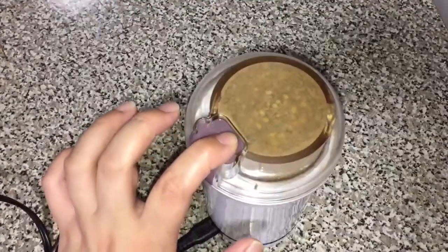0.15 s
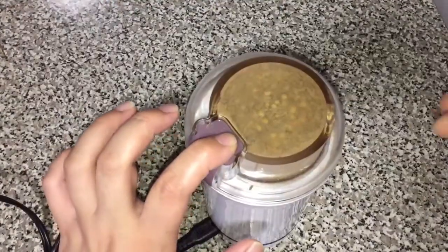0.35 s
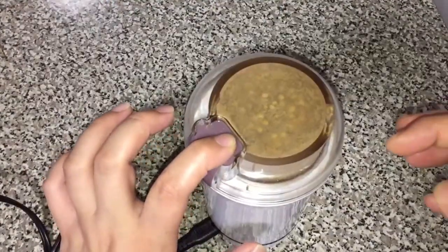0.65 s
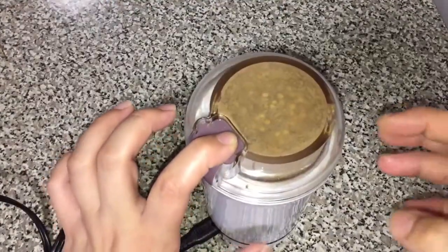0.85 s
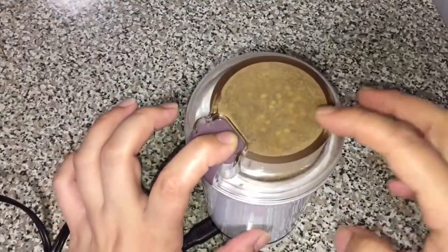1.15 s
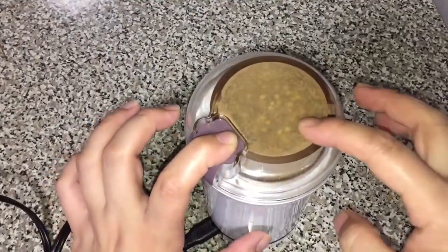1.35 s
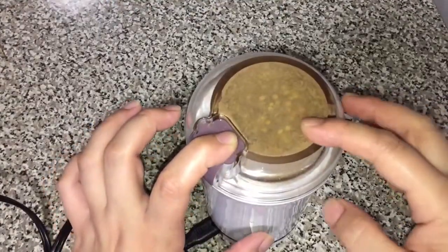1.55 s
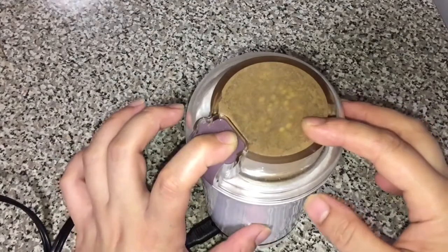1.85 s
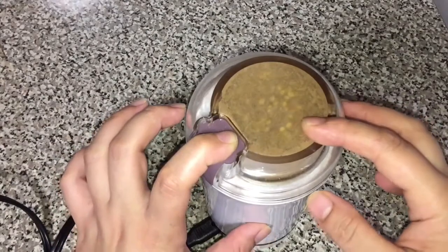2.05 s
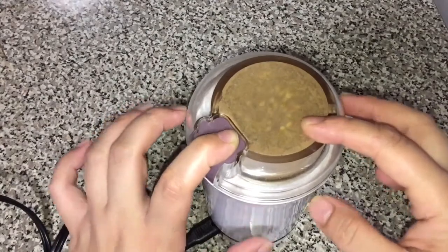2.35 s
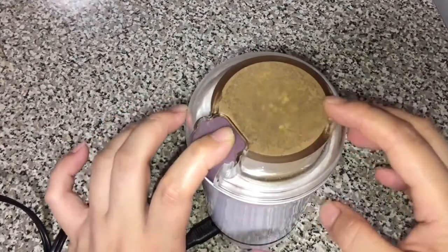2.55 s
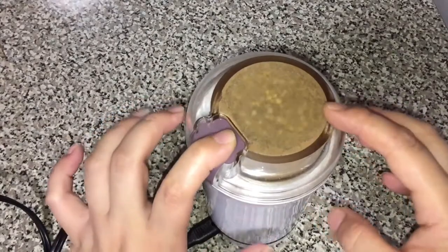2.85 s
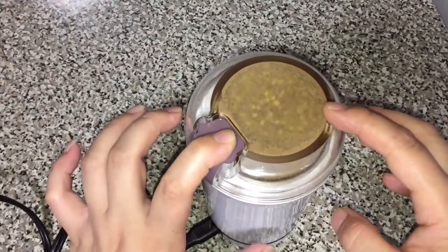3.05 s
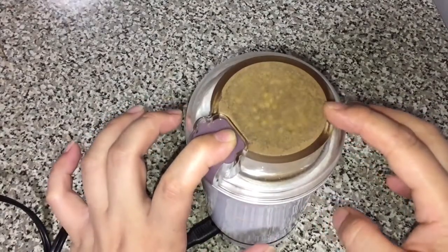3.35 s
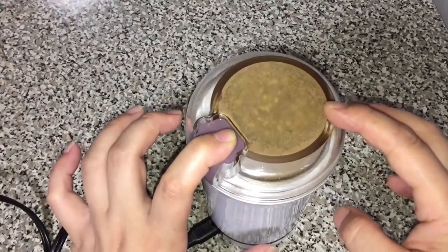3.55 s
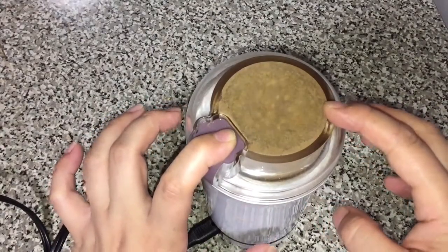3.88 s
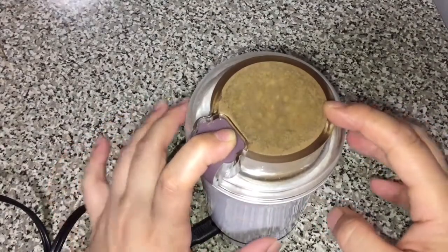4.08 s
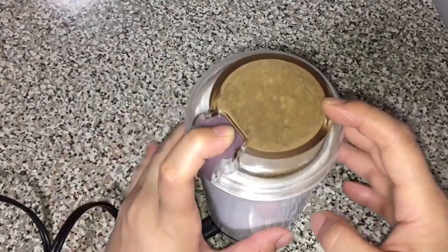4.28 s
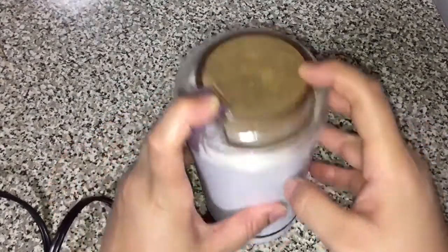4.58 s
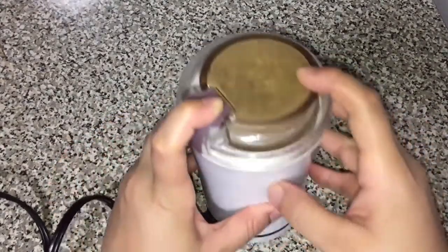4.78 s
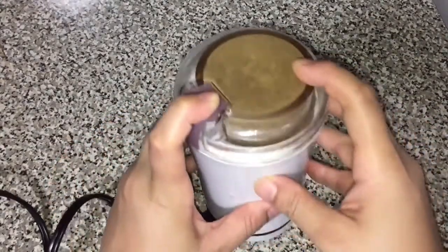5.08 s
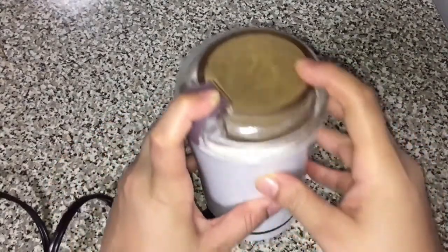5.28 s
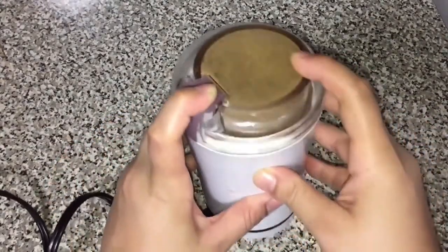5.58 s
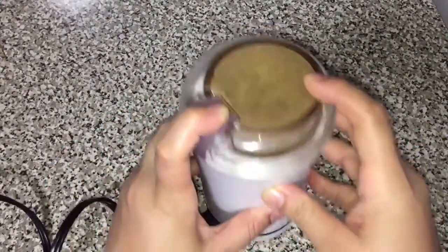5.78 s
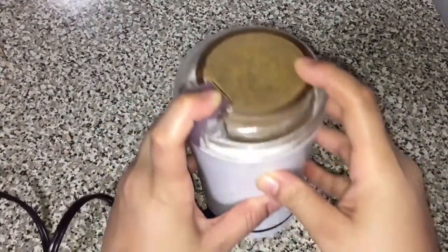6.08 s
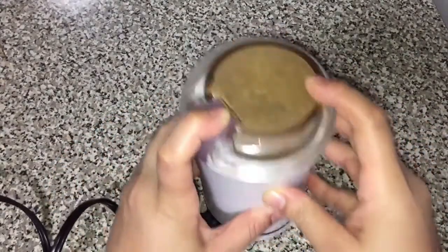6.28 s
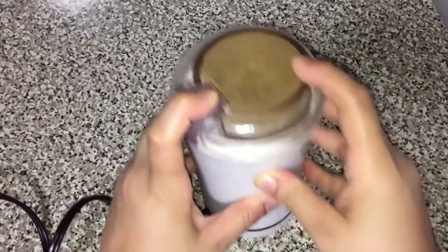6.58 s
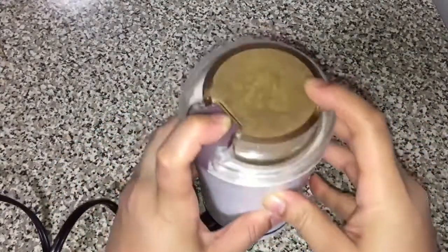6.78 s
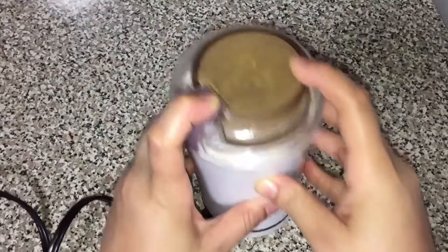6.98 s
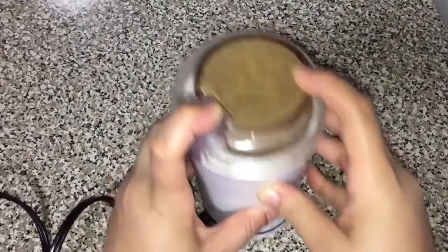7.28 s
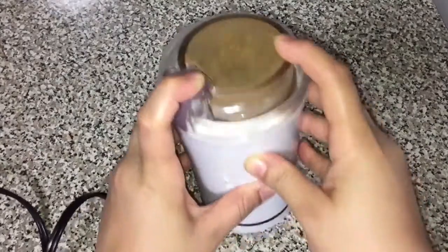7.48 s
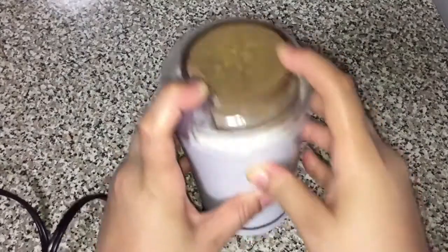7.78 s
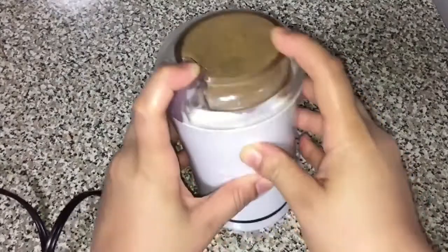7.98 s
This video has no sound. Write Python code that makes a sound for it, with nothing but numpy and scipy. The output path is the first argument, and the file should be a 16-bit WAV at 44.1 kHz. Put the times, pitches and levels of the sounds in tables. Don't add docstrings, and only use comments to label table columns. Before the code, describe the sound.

A blade grinder chews whole spices on a stone counter, close to the microphone. Buzzing motor, ringing cup, rattling lid and bright gritty hiss run continuously, interrupted once by a third-of-a-second coast-down and a thumping, rattling restart. The final half is hand-held: quick regular shakes make the motor hum and whine swell and waver, while the grind becomes slightly smoother. Quiet refrigerator drone behind; mono, fairly dry.

```python
import sys
import numpy as np
from scipy import signal
from scipy.fft import rfft, irfft, next_fast_len
from scipy.io import wavfile
from scipy.ndimage import uniform_filter1d, map_coordinates

SR = 44100
rng = np.random.default_rng(int(sys.argv[2]) if len(sys.argv) > 2 else 0)


def pcm_store(signal):
    levels = np.round(np.clip(np.atleast_2d(signal), -1, 1) * 32767)
    wavfile.write(sys.argv[1], SR, levels.astype(np.int16).T)


def volts_from_decibels(level):
    exponent = np.asarray(level, float) / 20
    return 10 ** exponent


N = 358533
OFF_S, ON_S = 2.53, 2.853
STILL_DB = -14

# time in seconds, turns per second in Hz,
# unbalance level in dB, blade-tip level in dB.
RUNNING = [(0, 258.6, -24.5, -48), (.15, 269.5, -24, -46.5), (.45, 280, -29, -42), (.66, 276.2, -28, -42),
           (.8, 283.5, -28.5, -37.5), (1.02, 287.3, -24.5, -35), (1.32, 283.5, -23, -33.5),
           (1.75, 285.4, -26.5, -34.5), (2.1, 283.5, -26.5, -33), (2.5, 280, -23, -39),
           (3.33, 288.3, -22.5, -31), (4.31, 276.4, -22, -39), (4.44, 278.5, -21, -38.5),
           (4.6, 277.4, -28, -38), (5.15, 281.2, -26, -37.5), (5.7, 285, -26, -45.5),
           (6.5, 287.2, -26.5, -49), (8.13, 296.5, -25.5, -47)]
# time in seconds, unbalance swell in dB, hum swell in dB.
SHAKES = [(4.82, 6, -2), (5.08, 5, 2), (5.35, 5, 3), (5.62, 4.5, 6), (5.87, 5.5, 6), (6.14, 5, 3),
          (6.385, 5, 7), (6.67, 4.5, 8), (6.94, 5, 6), (7.21, 5.5, 8), (7.48, 5.5, 9), (7.75, 4.5, 7),
          (8.01, 3, 8)]
# time in seconds, share of lifting from 0 to 1.
LIFT = [
    (0, 0.03),
    (4.3, 0),
    (4.55, 0.99),
    (8.13, 1),
]


def speed():
    t = np.arange(N) / SR
    coast_s, spin_up_s = .19, .108
    left = np.exp(-np.clip(t - OFF_S, 0, ON_S - OFF_S) / coast_s)
    lost = (1 - left) * np.exp(-(np.clip(t - ON_S, 0, None) / spin_up_s) ** 1.12)
    loaded = curves(RUNNING)[0] + 0.76 * swell(1, width=.07)
    return loaded * (1 - lost)


def shaft_phase():
    return 2 * np.pi * np.cumsum(speed() * (1 + 0.00204 * wobble(25))) / SR


def torque_db():
    return -13 * unpowered() + STILL_DB * at_rest()


def order_db(hz, order, db, mode_hz, width_hz, gain_db):
    # time in seconds, half length in seconds, order, change in dB.
    flare_events = [(.05, .06, 4, 16), (.12, 0.17, 7, 11), (.02, 0.033, 7, -4), (.2, 0.22, 5, 3),
                    (.2, 0.18, 9, 6), (.3, .2, 11, 7.5), (.38, .07, 5, 6.5), (.42, .06, 7, 6.5),
                    (0.542, .2, 7, 4), (.87, .12, 5, 5), (1.106, .14, 3, 9.5), (1.1, .1, 7, -8),
                    (1.7, 0.59, 6, 4), (1.9, .15, 3, 3), (2.23, .08, 6, 9), (2.5, 0.054, 7, 5.5),
                    (2.94, 0.021, 7, 12), (2.94, .03, 6, 8), (3.05, 0.051, 6, 19), (3.6, 0.45, 6, -1),
                    (4.28, 0.22, 7, -8), (3.171, 0.046, 7, 0.5), (3.18, .04, 6, 11), (4.7, .5, 5, 7),
                    (4.95, 0.31, 4, -2), (6.5, .4, 6, 4), (7.25, .15, 6, 10)]
    tips_db, order = curves(RUNNING)[2], round(order)
    crossing = gain_db * np.exp(-((order * hz - mode_hz) / width_hz) ** 4)
    flares = bells([row for row in flare_events if round(row[2]) == order], 3)
    shared = (order < 5) * 0.48 * (tips_db - tips_db.mean())
    return db + crossing + flares + shared


def shaft_orders(phase):
    # frequency in Hz, gain in dB.
    mount_gain = [(50, -26), (95, -9.5), (120, -8), (185, -5), (215, -14), (238, -17), (256, -3), (272, 0)]
    # order, level in dB, mode in Hz, width in Hz, gain in dB.
    chatter_orders = [(3, -56.5, 857, 20, 4.5), (4, -56.5, 1126, 25, 10.5), (5, -45.5, 1340, 49, 15),
                      (6, -47, 1700, 33, 8.5), (7, -46, 1896, 90, 19), (9, -62.5, 2440, 80, 16),
                      (11, -63, 3030, 80, 15)]
    hz, sink_db = speed(), torque_db()
    loaded, unbalance_db, tips_db = curves(RUNNING)

    slowness = np.clip(9 * (1 - hz / loaded), 0, 1)
    tips_db = tips_db + sink_db - 12 * (.5 + .5 * ramp(ON_S, .01)) * slowness
    f, mount_db = np.transpose(mount_gain)
    unbalance_db = unbalance_db + np.interp(hz, f, mount_db)
    unbalance_db += swell(1, width=0.048) + 0.24 * swell(1, width=.04, lag=0.088)

    whine = tone(phase, unbalance_db + .4 * wobble(17))
    whine += tone(2 * phase, tips_db + 1.6 * wobble(30))
    for row in chatter_orders:
        dips_db = 3.3 * np.abs(wobble(28)) + 4.2 * np.abs(wobble(60))
        whine += tone(round(row[0]) * phase, order_db(hz, *row) + sink_db + 4.0 - dips_db)
    return whine


def mains_hum(phase):
    # time in seconds, half length in seconds, change in dB.
    surges = [
        (0, .1, 3),
        (1.4, .1, -3),
        (2.55, .02, 6),
        (2.88, 0.015, 9.5),
        (2.925, .035, -3),
        (4.55, 0.39, -3),
    ]
    # time in seconds, level in dB.
    sideband_levels = [
        (0, -42),
        (1.5, -45),
        (2.5, -63),
        (3.05, -39),
        (3.13, -56),
        (4.4, -56),
    ]
    field = 2 * np.pi * 120 * np.arange(N) / SR
    hum_db = -34 - 23 * unpowered() + bells(surges, 2) + swell(2, width=0.066)
    hum_db -= 0.73 * curves([(4.1, 0, 0), *SHAKES])[1]
    hum = tone(field, hum_db + .6 * wobble(17)) + tone(2 * field, hum_db - 24 + 2.5 * wobble(12))

    beat_db = curves(sideband_levels)[0] - 17 * (ramp(OFF_S, .04) - ramp(ON_S + .14, .04))
    beats = tone(phase - field, beat_db + 1.6 * wobble(12))
    beats += tone(phase + field, beat_db - 15.0 + 3.7 * wobble(12))
    return hum + beats


def seed_clumps(phase):
    clump_db = 0.26 * wobble(9) + 0.63 * wobble(45) + 0.77 * wobble(300) + 0.63 * np.sin(phase)
    return volts_from_decibels(clump_db)


def struck(clumps, response):
    return filtered(clumps * rng.standard_normal(N), response)


def modes(table):
    # frequency in Hz, level in dB per Hz.
    fizz_spectrum = [(700, -70), (1150, -27), (2200, -48), (4100, -28), (5000, -36), (6500, -21),
                     (7800, -25.5), (10400, -28), (11500, -23), (13500, -24.3), (14500, -23),
                     (15700, -24.4)]

    def response(f):
        power = sum(volts_from_decibels(2 * db) * (f * w) ** 2 / ((c * c - f * f) ** 2 + (f * w) ** 2)
                    for c, w, db in table)
        highpass = f ** 4 / (f ** 4 + 1100 ** 4)
        return np.sqrt(power * highpass + colour(fizz_spectrum)(f) ** 2)
    return response


def ringing_cup(clumps):
    # mode in Hz, width in Hz, level in dB.
    standing_modes = [(1333, 67, -6.2), (1423, 102, -7.8), (1606, 41, -10.9), (1899, 87, -1.7),
                      (2429, 168, -15.8), (3029, 215, -20.8), (3734, 291, -14.2), (4661, 235, -13.0),
                      (5395, 233, -12.5), (5694, 44, -8.9), (5859, 154, -9.2), (6191, 205, -7.4),
                      (6366, 36, -1.5), (6672, 81, -3.1), (6840, 165, -5.0), (7242, 207, -12.8),
                      (7592, 45, -5.8), (8658, 245, -19.7), (9202, 206, -20.4), (9793, 450, -23.5),
                      (11785, 155, -21.7)]
    # mode in Hz, width in Hz, level in dB.
    lifted_modes = [(1329, 53, -5.5), (1403, 53, -8.8), (1499, 40, -8.2), (1631, 38, -7.1),
                    (1709, 74, -8.7), (1905, 59, -0.4), (2378, 71, -11.6), (2541, 99, -16.2),
                    (3079, 199, -14.0), (3591, 122, -15.1), (3853, 180, -16.8), (4458, 270, -18.2),
                    (5341, 287, -16.1), (5805, 202, -13.2), (6218, 103, -2.5), (6337, 37, 0.1),
                    (6668, 94, -9.5), (6768, 450, -10.4), (7544, 116, -14.5), (9068, 450, -20.4),
                    (9795, 209, -21.0)]
    # delay in seconds, level in dB.
    wall_echoes = [
        (.0043, -18),
        (.0089, -18),
        (.016, -19),
        (.027, -20),
    ]
    lift = np.clip(curves(LIFT)[0], 0, 1)
    cup = np.sqrt(1 - lift) * struck(clumps, modes(standing_modes))
    cup += np.sqrt(lift) * struck(clumps, modes(lifted_modes))
    cup = patchy(cup, depth_db=1.21)
    return cup + sum(volts_from_decibels(db) * np.roll(cup, round(s * SR)) for s, db in wall_echoes)


def grinding(clumps, jolt_events):
    # time in seconds, level in dB.
    powder_swirl = [
        (2.52, 0.5),
        (2.68, -6),
        (2.73, -10.5),
        (2.79, -26),
        (2.847, -35),
        (2.864, -9.5),
        (2.9, 2),
        (2.96, 2.5),
        (3.0, 0),
    ]
    t = np.arange(N) / SR
    swirl_db = curves(powder_swirl)[0]
    swirl_db += 1.5 * (ramp(ON_S, 0.044) - ramp(ON_S + 0.16, 0.49))
    swirl_db -= ramp(.15, .12) - ramp(1.9, 0.18)
    hiss_db = -20.8 + swirl_db + 0.24 * swell(1, width=0.073, lag=0.019) + 0.17 * wobble(4.006)
    hiss_db -= ramp(4.85, 1.8)
    body_db = -25.6 + 0.77 * swirl_db + bells(jolt_events, 2)
    body_db += -0.25 * swell(2, width=0.071) + 0.33 * wobble(8.3)

    cup = ringing_cup(clumps)
    low = lambda hz: 1 / (1 + (hz / 2900) ** 8)
    body = unit(filtered(cup, low))
    hiss = unit(filtered(cup, lambda hz: 1 - low(hz)))
    coast_db = np.interp(t, [2.52, 2.62, 2.74, 2.8, 2.85, 2.856], [0, -3, -4.0, 5, -2, 0])
    air = filtered(hiss, lambda hz: 1 - 1 / (1 + ((hz - 6600) / 1300) ** 6))
    hiss += air * (volts_from_decibels(coast_db) - 1)
    ring = filtered(body, lambda hz: 1 / (1 + ((hz - 1950) / 130) ** 4))
    body += ring * (volts_from_decibels(-5 * (ramp(OFF_S, .06) - ramp(ON_S + .05, .04))) - 1)
    return volts_from_decibels(hiss_db) * hiss + volts_from_decibels(body_db) * body


def loose_parts(clumps, jolt_events):
    # frequency in Hz, level in dB per Hz.
    rattle_spectrum = [(700, -32), (800, -27), (870, -5), (920, 1), (990, -3.5), (1060, 1), (1150, -24),
                       (1400, -23.5)]
    knock_spectrum = [(260, -46), (330, -11), (420, -10.5), (520, -7), (620, 2.5), (700, -11), (800, -8.5),
                      (950, -44)]
    rumble_spectrum = [(85, -56), (110, 0), (140, -3), (170, -1.5), (200, -2.5), (230, -11.5), (300, -6),
                       (380, -24), (600, -57)]
    t, lift = np.arange(N) / SR, curves(LIFT)[0]
    kick_db = 13 * ramp(ON_S, .011) * np.exp(-np.clip(t - ON_S - .03, 0, None) / 0.18)

    rattle_db = -42.4 - 2.6 * ramp(5.4, 1)
    rattle_db -= 2.4 * (1 - ramp(1.9, 0.37))
    rattle_db += 10 * unpowered()
    rattle_db += 1.8 * STILL_DB * at_rest() + kick_db + 0.72 * wobble(2.95)
    knock_db = -44 - lift + STILL_DB * at_rest() + bells(jolt_events, 3)
    rumble_db = -42 - 4.4 * lift + 0.43 * STILL_DB * at_rest()
    rumble_db += bells(jolt_events, 4) + 0.99 * wobble(2.95)

    out = volts_from_decibels(rattle_db) * unit(struck(clumps, colour(rattle_spectrum)))
    out += volts_from_decibels(knock_db) * unit(struck(clumps, colour(knock_spectrum)))
    return out + volts_from_decibels(rumble_db) * unit(struck(clumps, colour(rumble_spectrum)))


def seeds(phase):
    # time in seconds, half length in seconds, cup
    # body in dB, base knock in dB, rumble in dB.
    jolt_events = [
        (.1, .1, 1.5, 1, -2),
        (2.565, .025, -1, 3, 11),
        (2.62, .03, 1, 3, 0),
        (2.865, .009, 9.5, -5, 11),
        (2.885, 0.013, 3, 5, 11),
        (2.95, 0.049, 1.5, 8.5, 6),
        (3.06, 0.03, 0, 1, 5),
        (7.65, 0.058, 2.5, 0, -3),
    ]
    clumps = seed_clumps(phase)
    return grinding(clumps, jolt_events) + loose_parts(clumps, jolt_events)


def switch():
    # time in seconds, tick peak in dB, base jolt in dB.
    contact_events = [
        (2.852, -28.5, -32),
    ]
    out, t = np.zeros(N), np.arange(SR // 4) / SR
    for s, tick_db, jolt_db in contact_events:
        tick = volts_from_decibels(tick_db - 60 * t / .014) * rng.standard_normal(len(t))
        rocking = (t / 0.071) ** 2 * np.exp(2 - 2 * t / 0.074) * np.exp(-(t / .13) ** 4)
        jolt = volts_from_decibels(jolt_db) * rocking * np.sin(2 * np.pi * 68 * t)
        out[round(s * SR):][:len(t)] += tick + jolt
    return out


def kitchen():
    # frequency in Hz, rms level in dB.
    fridge_lines = [
        (102, -47.5),
        (352, -57),
    ]
    # frequency in Hz, level in dB per Hz.
    drone_spectrum = [(25, -30), (48, -20), (57, -5), (67, 5), (77, -2), (86, -5), (100, -40)]
    room_spectrum = [(24, -24), (40, -22), (368, -20), (817, -4), (1520, 14), (2920, -27), (3560, -27),
                     (6320, -40), (15500, -49)]
    t = np.arange(N) / SR
    hum = sum(tone(2 * np.pi * hz * t, db + 2.0 * wobble(11)) for hz, db in fridge_lines)
    drone = volts_from_decibels(-48.5) * unit(filtered(rng.standard_normal(N), colour(drone_spectrum)))
    hush = volts_from_decibels(-56) * unit(filtered(rng.standard_normal(N), colour(room_spectrum)))
    return hum + drone + hush


def unpowered():
    return ramp(OFF_S, 0.028) - ramp(ON_S, .01)


def at_rest():
    return ramp(2.765, .035) - ramp(ON_S, 0.014)


def swell(column, width, lag=0):
    return bells([(row[0] + lag, width, row[column]) for row in SHAKES], 2)


def bells(rows, column):
    t = np.arange(0, N / SR, .001)
    total = sum(row[column] * np.exp(-((t - row[0]) / row[1]) ** 2) for row in rows)
    return np.interp(np.arange(N) / SR, t, total)


def ramp(start, length):
    return np.clip((np.arange(N) / SR - start) / length, 0, 1)


def curves(rows):
    s, *cols = np.transpose(rows)
    return [np.interp(np.arange(N) / SR, s, c) for c in cols]


def wobble(rate):
    knots = rng.standard_normal(N // 20)
    steps = np.arange(0, N + 8, 8)
    return np.interp(np.arange(N), steps, map_coordinates(knots, [steps * rate / SR]))


def tone(phase, db):
    return np.sqrt(2) * volts_from_decibels(db) * np.sin(phase + rng.uniform(0, 2 * np.pi))


def unit(x):
    return x / np.sqrt(np.mean(x ** 2) + 1e-20)


def filtered(x, response):
    m = next_fast_len(N + SR // 2)
    return irfft(rfft(x, m) * response(np.fft.rfftfreq(m, 1 / SR)), m)[:N]


def colour(points):
    f, db = np.transpose(points)
    return lambda hz: volts_from_decibels(np.interp(np.log(hz + 1), np.log(f + 1), db))


def patchy(x, depth_db):
    z = signal.stft(x, nperseg=1024)[2]
    patches = uniform_filter1d(rng.standard_normal(z.shape), size=7, axis=0)
    patches = uniform_filter1d(patches, size=9, axis=1)
    return signal.istft(z * volts_from_decibels(depth_db * unit(patches)), nperseg=1024)[1][:N]


def scene():
    phase = shaft_phase()
    mono = shaft_orders(phase) + mains_hum(phase) + seeds(phase) + switch() + kitchen()
    return np.array([mono, mono])


def top_cut(x):
    return signal.sosfilt(signal.butter(12, 16960, fs=SR, output="sos"), x)


def record(dry):
    kept = filtered(dry[0], lambda hz: hz < 15750)
    mix = np.array([kept, kept])
    return top_cut(mix)


dry = scene()
out = record(dry)
pcm_store(out)
```